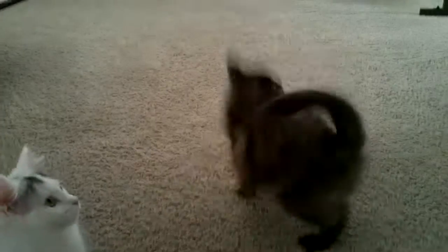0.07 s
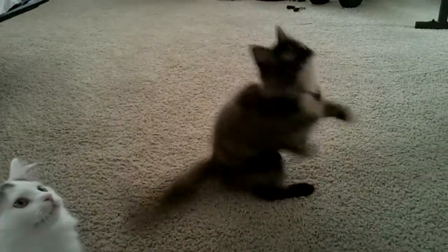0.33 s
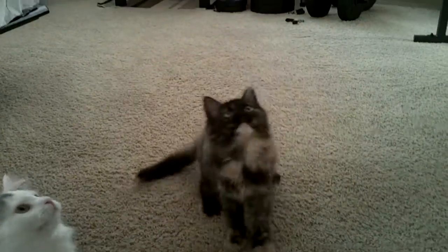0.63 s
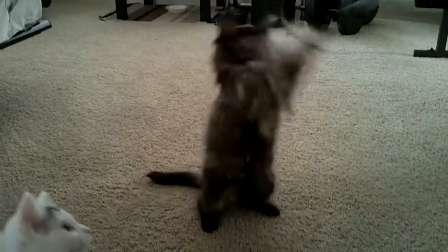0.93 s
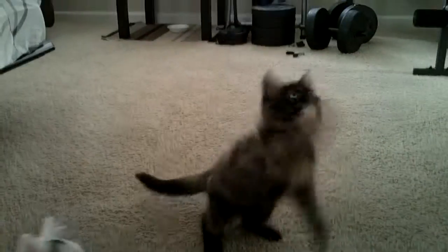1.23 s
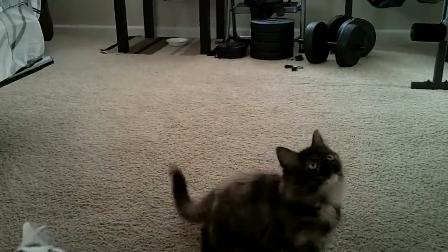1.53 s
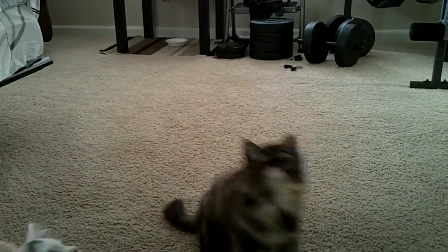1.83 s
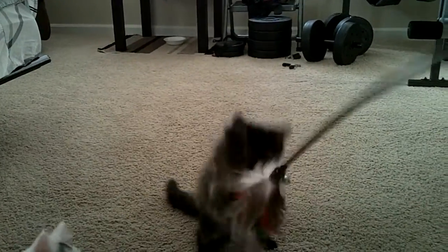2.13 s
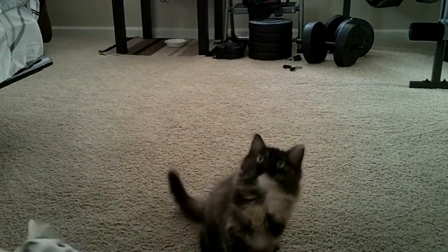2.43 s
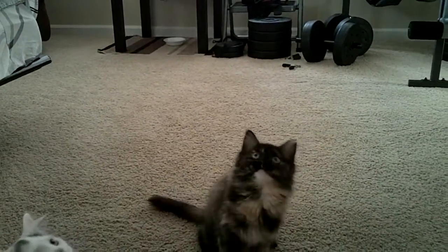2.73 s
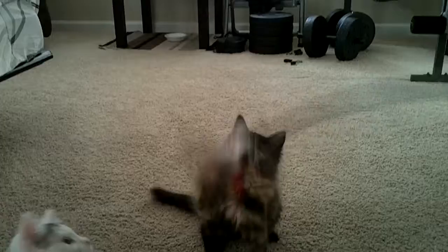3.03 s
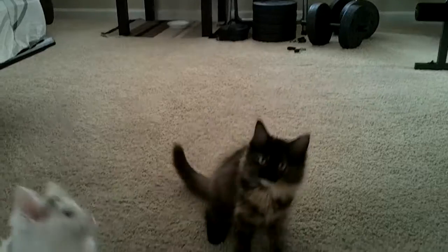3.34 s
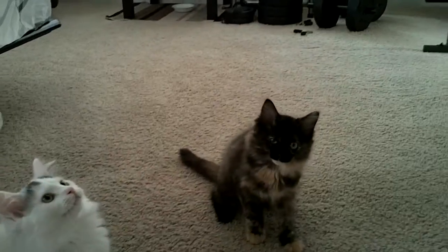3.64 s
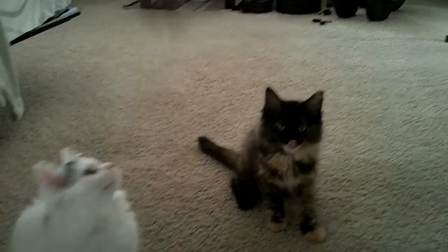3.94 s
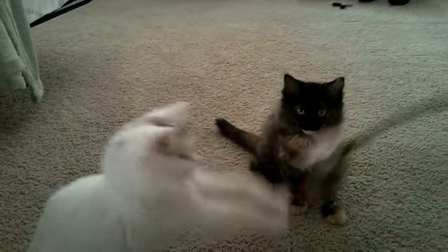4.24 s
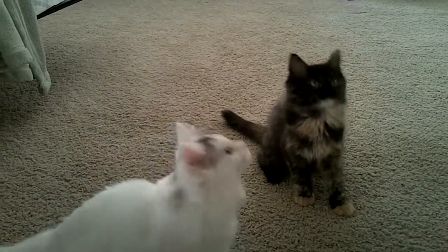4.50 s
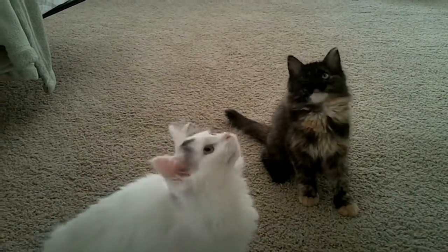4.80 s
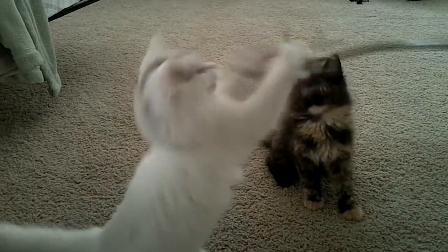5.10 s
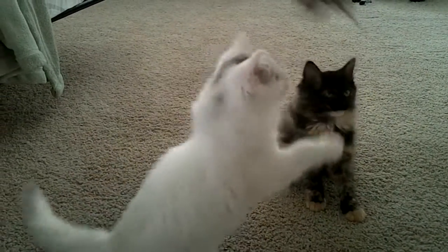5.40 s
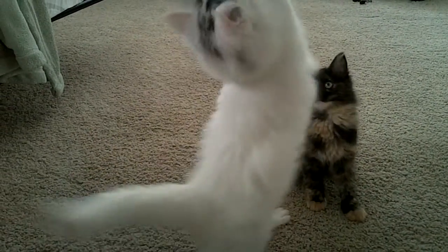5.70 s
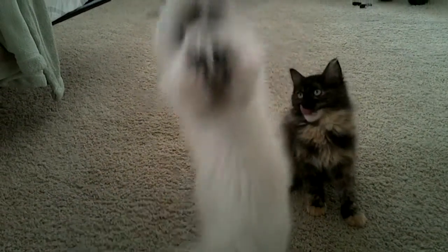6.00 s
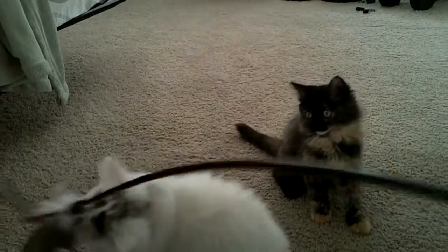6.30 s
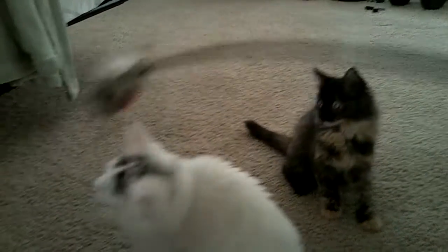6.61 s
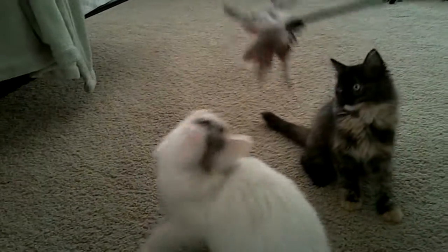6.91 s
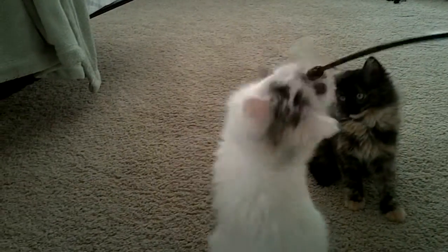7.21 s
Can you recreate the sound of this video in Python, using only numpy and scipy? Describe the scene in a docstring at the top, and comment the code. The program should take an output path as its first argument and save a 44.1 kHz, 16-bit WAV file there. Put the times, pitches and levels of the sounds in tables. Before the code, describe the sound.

Kittens land on carpet with dull thumps while a flicked feather toy swishes and its little bell jingles in a quiet room.

```python
"""A small bell jingles and feathers swish as two kittens chase a wand toy in a quiet room.
Each flick of the wand sweeps the feathers and throws the bell's pellet against its shell;
between flicks the toy swings and the pellet rolls in soft swells, with lighter strikes.
Paws land on the carpeted floor with dull thumps, and there is one tiny squeak.
Low room rumble, microphone hiss and a faint buzz lie underneath."""
import sys
import numpy as np
from scipy import signal
from scipy.fft import rfft, irfft
from scipy.io import wavfile
from scipy.ndimage import uniform_filter1d

SR = 44100
rng = np.random.default_rng(int(sys.argv[2]) if len(sys.argv) > 2 else 0)


def generate_wav(signal):
    """Clip the signal to [-1, 1] and save it as 16-bit WAV at the path in sys.argv[1]."""
    frames = np.transpose(np.atleast_2d(signal))
    scaled = np.clip(frames, -1, 1) * 32767
    pcm = np.round(scaled).astype(np.int16)
    wavfile.write(sys.argv[1], SR, pcm)


N = 324115

# Clear pellet strikes. Each row: start in seconds, relative level in dB, relative overtone level in dB.
PELLET_STRIKES = [(0.0034, -37, -51), (0.0558, -41, -59), (1.052, -43, -57), (1.0769, -29.5, -50),
                  (1.1389, -27, -48), (1.2401, -36, -59), (1.4496, -38.5, -63), (2.1662, -37, -63),
                  (2.1995, -19, -48), (2.2507, -31.5, -56), (2.2941, -32, -52), (2.6193, -51, -78),
                  (2.9353, -45, -65), (2.9577, -45, -67), (3.046, -51, -66), (3.0964, -46.5, -72),
                  (3.206, -40, -63), (3.3528, -49, -60), (3.5708, -39.5, -66), (3.664, -39, -64),
                  (3.9699, -52, -66), (4.2095, -45.5, -59), (4.2697, -25, -45.5), (4.276, -22.5, -51),
                  (4.3182, -36, -71), (5.0758, -43.5, -75), (5.1548, -42, -61), (5.2395, -40, -54),
                  (5.2519, -31.5, -64), (5.3127, -32, -47), (5.4893, -41.5, -66), (6.0072, -24, -43),
                  (6.0127, -22, -48), (6.1005, -27, -43.5), (6.2381, -21.5, -43), (6.2593, -30, -62),
                  (6.338, -34.5, -57), (6.4519, -33, -59), (6.546, -41, -65), (6.6852, -39, -61),
                  (6.8316, -41.5, -61), (7.3242, -27, -46.5)]
# Bell shell. Each row: frequency in Hz, gain in dB, base T60 in seconds, share of hardness from 0 to 1.
SHELL_MODES = [(5906, 0, .12, 0), (6308, -12, .115, 0), (6120, -19, .016, 0), (6620, -18, .014, 0),
               (7150, -17, .008, .3), (13464, -2, .065, 1), (14280, -7, .055, 1)]
# Pellet contact tick. Each row: frequency in Hz, spectral gain in dB.
TICK_SPECTRUM = [(1500, -21.5), (3500, -7.5), (5400, 3), (6800, 17), (9000, 7.5), (12000, -5), (15500, -10)]
# Feathers lying on the shell. Each row: start in seconds, end in seconds, factor on the ring time.
MUFFLED_SPANS = [(2.866, 3.6, 0.44), (4.15, 4.21, 0.28), (4.37, 4.62, 0.46), (5.04, 5.228, 0.43),
                 (6.495, 7.36, 0.55)]
# Wand flicks. Each row: start in seconds, hold in seconds, rattle drive in dB, swish level in dB.
WAND_FLICKS = [(0, 0.024, -42.5, -55.5), (1.044, 0.1, -42, -60.5), (2.157, 0.15, -48.5, -66),
               (4.267, .05, -45, -66), (5.213, .12, -44, -73), (5.997, .17, -42, -63),
               (6.26, 0.081, -47.5, -70), (7.281, 0.044, -45, -65)]
# Swings that roll the pellet. Each row: centre in seconds, drive in dB, Gaussian sigma in seconds.
TOY_SWINGS = [(.28, -53.5, 0.061), (.44, -58, 0.012), (.6, -65.5, .035), (.89, -54, 0.04),
              (1.51, -48.5, 0.081), (1.86, -51.5, .033), (2.61, -56, 0.049), (2.97, -59.5, 0.053),
              (3.49, -59.5, .07), (3.72, -54, 0.037), (3.985, -48.5, 0.016), (4.745, -56.5, 0.033),
              (4.95, -64, 0.021), (5.09, -54, 0.019), (5.52, -53.5, 0.094), (5.76, -56.5, 0.057),
              (6.72, -55, 0.1), (7.0, -58.5, 0.099)]
# Feather rustle. Each row: frequency in Hz, spectral gain in dB.
FEATHER_SPECTRUM = [(500, -0.5), (1200, -0.5), (2200, -3), (3500, 1.5), (5000, 4.5), (9000, -5),
                    (15000, -43)]
# Feathers snapping taut. Each row: centre in seconds, level in dB, Gaussian sigma in seconds.
FEATHER_SNAPS = [(5.245, -60, 0.019), (6.071, -54, 0.0048), (7.206, -63.5, 0.0082)]
# Paw landings. Each row: start in seconds, drive in dB, centre frequency in Hz, spread in octaves.
PAW_LANDINGS = [(0.116, -44, 420, 1.2), (0.119, -27, 194, 0.31), (.181, -35.5, 156, 0.93),
                (.191, -36, 760, 1.57), (.382, -43, 187, 0.44), (.675, -58, 129, 0.64),
                (0.883, -50.5, 106, 0.23), (3.357, -51, 143, 0.92), (3.681, -49, 65, .4),
                (5.818, -57, 216, 0.74), (6.197, -46.5, 95.5, 1.14), (6.356, -34.5, 348, 0.33),
                (6.36, -41.5, 124, 0.7), (7.133, -48.5, 93, 0.47)]
# Carpeted floor. Each row: frequency in Hz, gain in dB, T60 in seconds.
FLOOR_MODES = [(62, -1, 0.37), (132.3, 1, 0.18), (207.6, -1.5, 0.18), (263.7, -6, 0.14), (350, 1.5, 0.045),
               (451.4, -8.5, 0.11), (549, -5.5, 0.037), (663, -6, 0.037), (855, 2, 0.0043),
               (1250, -9, 0.037), (1710, -8.5, 0.0088)]
# Squeak. One row: centre in seconds, frequency in Hz, peak in dB, Gaussian sigma in seconds.
SQUEAK_PIP = (4.2435, 4600, -54, .0008)
# Room rumble and microphone hiss. Each row: frequency in Hz, density in dB per Hz.
NOISE_SPECTRUM = [(30, -82.5), (60, -86.5), (120, -92), (250, -97), (500, -101.5), (1000, -105.3),
                  (2000, -107.6), (3500, -109.7), (9000, -111.3), (15000, -112.5)]
# Electrical buzz in the microphone. Each row: frequency in Hz, spectral gain in dB.
BUZZ_SPECTRUM = [(5000, -38), (7400, -38), (10200, 15), (12500, -13)]
# Dips in the microphone's response. Each row: frequency in Hz, width in Hz, depth from 0 to 1.
MIC_DIPS = [(2705, 800, 1), (5444, 400, 1), (7790, 1900, 0.89), (10850, 900, 1)]

ROOM_T60_S = 0.29


def bell_strikes(drive, gain_db=-1.24, overtone_db=6.5):
    """Pellet hits the shell; the swinging bell rings each time from a new spot in the room."""
    shells, ticks = np.zeros(N + SR), np.zeros(N + SR)
    clear = [(start_s, db, top_db + overtone_db - db) for start_s, db, top_db in PELLET_STRIKES]
    for start_s, db, hard_db in clear + light_strikes(drive):
        shell = shell_ring(db, hard_db, ring_factor(start_s))
        tick = pellet_ticks(db, hard_db)
        at = round(start_s * SR)
        shells[at:at + len(shell)] += room(shell, wet_db=-10)
        ticks[at:at + len(tick)] += tick
    return from_db(gain_db) * (shells[:N] + room(colour(ticks[:N], TICK_SPECTRUM), wet_db=-9))


def shell_ring(db, hard_db, t60_factor, doppler_hz=12, scatter_db=2):
    """One contact rings the shell's modes; a strong throw presses the pellet on and damps them."""
    t = seconds(SR // 3)
    hz, mode_db, t60_s, share = np.transpose(SHELL_MODES)[:, :, None]
    hz = hz + doppler_hz * rng.standard_normal() * hz / hz[0]  # the swing shifts the pitch
    t60_s = t60_s * t60_factor * from_db(-0.04 * (db + 34))
    uneven_db = scatter_db * rng.standard_normal(hz.shape) * (hz > hz[0])
    gains = from_db(mode_db + share * hard_db + uneven_db)
    gains[1] *= from_db(-0.45 * (db + 17.5))  # light contacts bring out the second mode
    modes = gains * decay(t, t60_s) * np.sin(2 * np.pi * (hz * t + rng.random(hz.shape)))
    rise_s = 0.00044 * from_db(-0.21 * (db + 29.5))  # glancing contacts build more slowly
    return from_db(db) * modes.sum(0) * (1 - np.exp(-t / rise_s)) * chatter(len(t))


def chatter(size, corner_hz=220, depth=0.38):
    """Fast gain flutter: the loose pellet chatters on the ringing shell."""
    pole = np.exp(-2 * np.pi * corner_hz / SR)
    flutter = signal.lfilter([1], [1, -2 * pole, pole * pole], rng.standard_normal(size))
    return 1 + depth * unit_rms(flutter)


def pellet_ticks(db, hard_db, count=4, base_gap_s=0.0049, t60_s=0.0076):
    """Sharp tick and weaker, uneven rebounds; harder contacts tick louder."""
    t = seconds(SR // 3)
    gaps_s = base_gap_s * rng.uniform(0.46, 1.6, count)
    age_s = t - (np.cumsum(gaps_s) - gaps_s[0])[:, None]
    loss_db = np.arange(count) * rng.uniform(0, 36, count)
    bursts = (age_s >= 0) * decay(np.abs(age_s), t60_s) * from_db(-loss_db)[:, None]
    return from_db(db - 1 + 0.61 * hard_db) * rng.standard_normal(len(t)) * bursts.sum(0)


def light_strikes(drive, rate_per_s=9, above_drive_db=3, spread_db=1, hard_db=-16):
    """Chance contacts. Each row: start in seconds, level in dB, hardness in dB."""
    starts = np.flatnonzero(rng.random(N) < rate_per_s / SR)
    db = 20 * np.log10(drive) + above_drive_db - spread_db * rng.standard_normal(N)
    return [(i / SR, db[i], hard_db) for i in starts]


def pellet_roll(drive, rate_per_s=200, spread_db=2.5, hard_db=-22, pair_db=7, tick_db=-7, gain_db=-1):
    """Many light touches of the rolling pellet keep the shell singing."""
    touches = (rng.random(N) < rate_per_s / SR) * rng.choice([-1, 1], N)
    touches = touches * from_db(spread_db * rng.standard_normal(N))
    shell = np.zeros(N)
    for k, (hz, db, t60_s, share) in enumerate(SHELL_MODES):
        gain = from_db(db + share * hard_db + pair_db * (k == 1))  # rolling evens out the first two modes
        shell += gain * resonate(touches * rng.standard_normal(N), hz, t60_s)
    shell = colour(shell, [(4500, -12.5), (5800, -7.5)]) * ring_factor(seconds(N))
    roll = room(shell + from_db(tick_db) * colour(touches, TICK_SPECTRUM), wet_db=-6)
    running_rms = np.sqrt(np.maximum(uniform_filter1d(roll ** 2, size=1100), 1e-9))
    return from_db(gain_db) * drive * roll / running_rms


def pellet_drive(attack_s=0.0075, release_s=0.097, dangle_db=-73):
    """How hard the pellet is thrown: abrupt flicks, smooth swings, a toy that is never quite still."""
    flicks = [from_db(db) * flick_envelope(start_s, hold_s, attack_s, release_s)
              for start_s, hold_s, db, _ in WAND_FLICKS]
    return np.maximum(np.max(flicks, axis=0), swells(TOY_SWINGS) + from_db(dangle_db))


def ring_factor(t):
    """Feathers on the shell muffle its ring; 1 when it hangs free."""
    factors = [np.where((t > start_s) & (t < end_s), factor, 1) for start_s, end_s, factor in MUFFLED_SPANS]
    return np.prod(factors, axis=0)


def feathers(lead_s=0.025, attack_s=0.0083, release_s=0.07, grain_db=3.5):
    """Grainy swish on each flick, just ahead of the pellet, plus a few snaps."""
    swishes = sum(from_db(db) * flick_envelope(start_s - lead_s, hold_s, attack_s, release_s)
                  for start_s, hold_s, _, db in WAND_FLICKS)
    grains = from_db(grain_db * unit_rms(uniform_filter1d(rng.standard_normal(N), size=60)))
    rustle = unit_rms(colour(rng.standard_normal(N) * grains, FEATHER_SPECTRUM))
    return (swishes + swells(FEATHER_SNAPS)) * rustle


def paws():
    """Each landing excites floor modes near its centre frequency: soft pads low, hard knocks high."""
    start_s, db, centre_hz, spread_oct = np.transpose(PAW_LANDINGS)
    floor = np.zeros(N)
    for k, (hz, mode_db, t60_s) in enumerate(FLOOR_MODES):
        coupling = gaussian(np.log2(hz / centre_hz), spread_oct)
        impacts = np.zeros(N)
        impacts[np.round(start_s * SR).astype(int)] = from_db(db + mode_db) * coupling
        floor += (-1) ** k * resonate(impacts, hz, t60_s)
    return room(floor, wet_db=-7)


def squeak():
    """One very short, high pip."""
    centre_s, hz, db, sigma_s = SQUEAK_PIP
    t = seconds(N) - centre_s
    return from_db(db) * gaussian(t, sigma_s) * np.sin(2 * np.pi * hz * t)


def background(buzz_hz=59.94, buzz_gain_db=-52):
    """Steady room rumble, thin microphone hiss and a faint electrical pulse train."""
    noise = colour(rng.standard_normal(N), NOISE_SPECTRUM) * np.sqrt(SR / 2)
    pulses = np.diff(np.floor(seconds(N) * buzz_hz + .5), prepend=0)
    return noise + from_db(buzz_gain_db) * colour(pulses, BUZZ_SPECTRUM)


def room(x, wet_db):
    """Direct sound plus a dense tail; each call is another spot in the room."""
    t = seconds(SR // 2)
    tail = rng.standard_normal(len(t)) * decay(t, ROOM_T60_S) * (t > .005)
    return x + from_db(wet_db) * signal.fftconvolve(x, tail / np.linalg.norm(tail))[:len(x)]


def flick_envelope(start_s, hold_s, attack_s, release_s):
    """Attack, hold, release."""
    t = seconds(N) - start_s
    return (1 - np.exp(-np.maximum(t, 0) / attack_s)) * np.exp(-np.maximum(t - hold_s, 0) / release_s)


def swells(rows):
    """Sum of smooth rises and falls."""
    t = seconds(N)
    return sum(from_db(db) * gaussian(t - centre_s, sigma_s) for centre_s, db, sigma_s in rows)


def resonate(clicks, hz, t60_s):
    """One mode: a unit click starts a decaying unit sine."""
    radius, angle = decay(1 / SR, t60_s), 2 * np.pi * hz / SR
    return signal.lfilter([0, np.sin(angle)], [1, -2 * radius * np.cos(angle), radius ** 2], clicks + 1e-18)


def colour(x, spectrum):
    """Filter by a dB curve interpolated over log frequency."""
    hz, db = np.transpose(spectrum)
    bins_hz = np.maximum(np.fft.rfftfreq(len(x), 1 / SR), 1)
    return irfft(rfft(x) * from_db(np.interp(np.log(bins_hz), np.log(hz), db)), len(x))


def decay(t, t60_s):
    return np.exp(-np.log(1000) * t / t60_s)


def gaussian(x, sigma):
    return np.exp(-.5 * (x / sigma) ** 2)


def from_db(db):
    return 10 ** (np.asarray(db) / 20)


def unit_rms(x):
    return x / np.sqrt(np.mean(x ** 2) + 1e-20)


def seconds(size):
    return np.arange(size) / SR


def scene():
    """Bell, feathers and paws in the quiet room; mono."""
    drive = pellet_drive()
    return (background() + paws() + squeak() + feathers() + pellet_roll(drive) + bell_strikes(drive))[None]


def record(dry, cutoff_hz=15350):
    """Microphone: a few narrow dips and a steep top cut."""
    for hz, width_hz, depth in MIC_DIPS:
        notched = signal.lfilter(*signal.iirnotch(hz, hz / width_hz, fs=SR), dry)
        dry = dry + depth * (notched - dry)
    return signal.sosfilt(signal.ellip(12, .1, 80, cutoff_hz, fs=SR, output="sos"), dry)


dry = scene()
out = record(dry)
generate_wav(out)
```